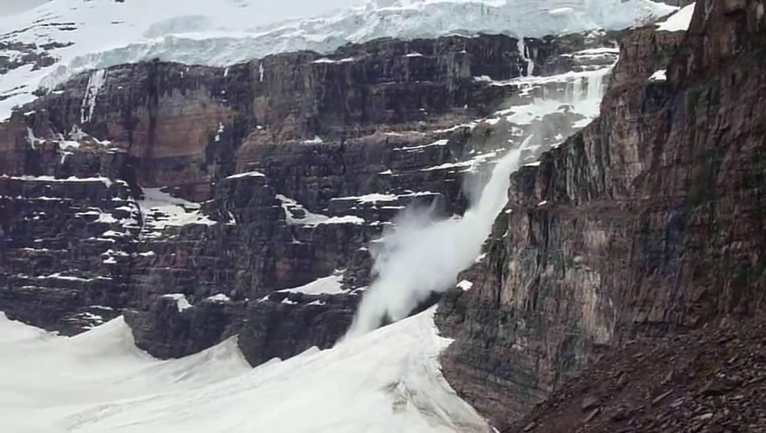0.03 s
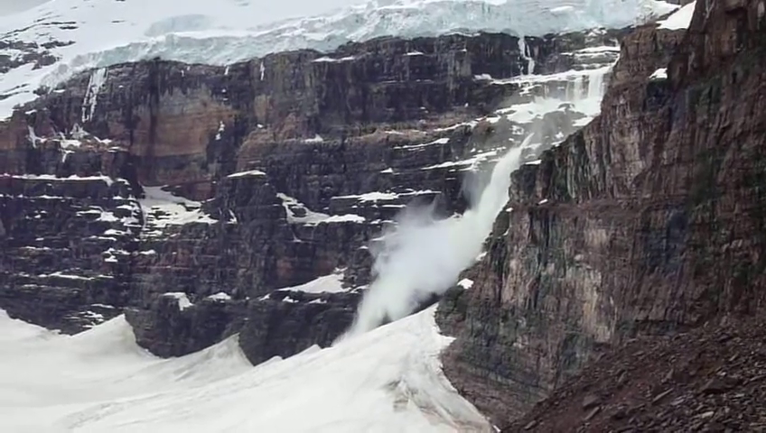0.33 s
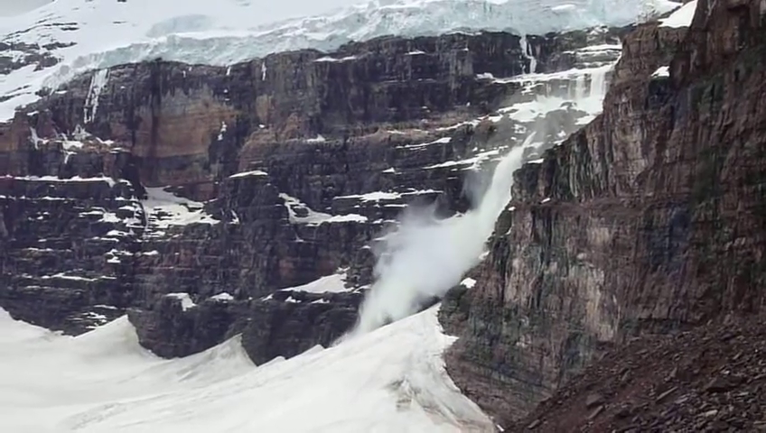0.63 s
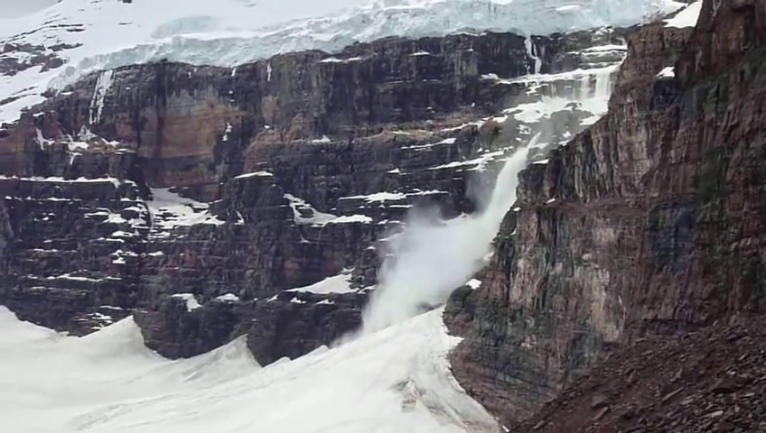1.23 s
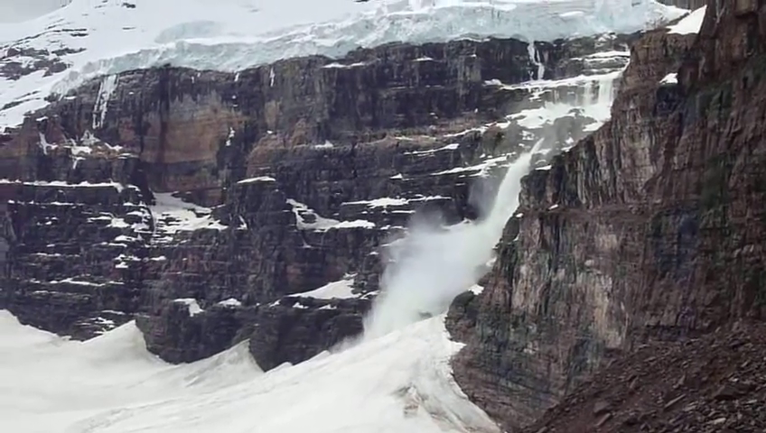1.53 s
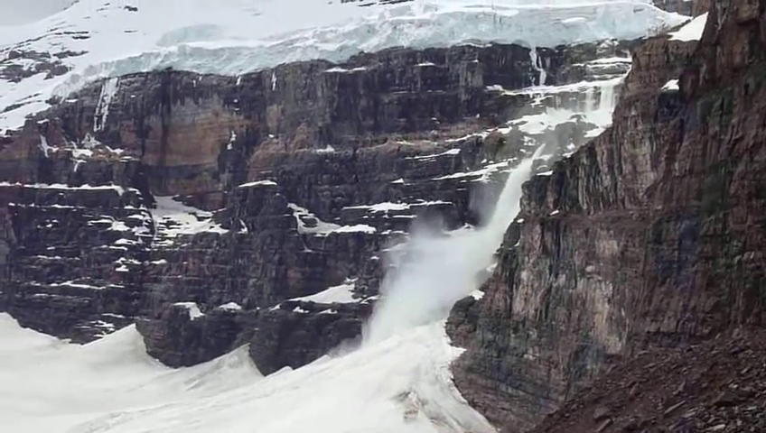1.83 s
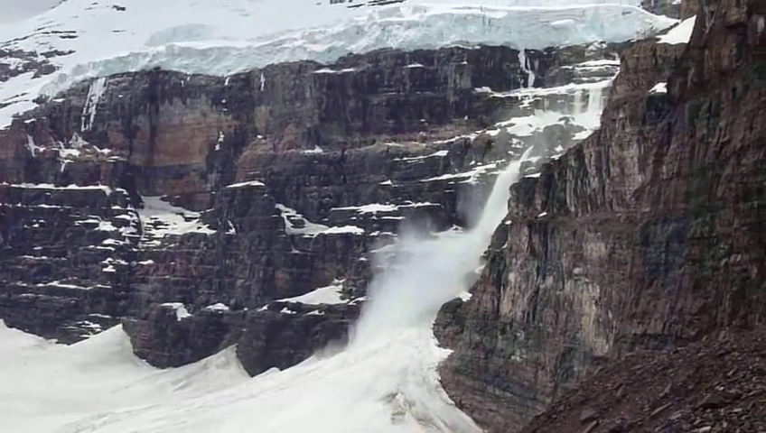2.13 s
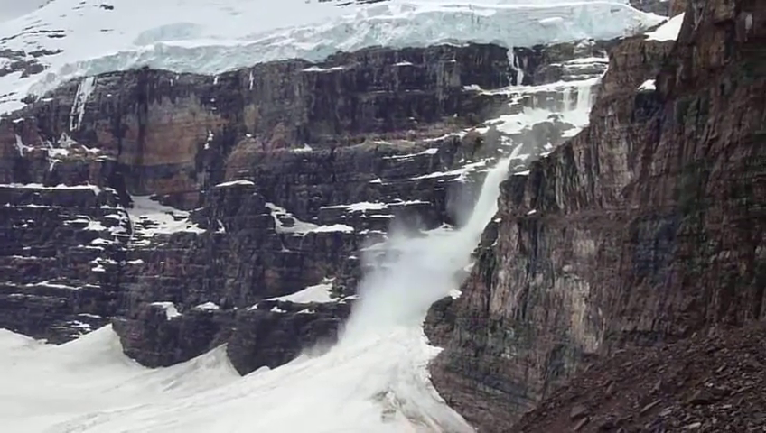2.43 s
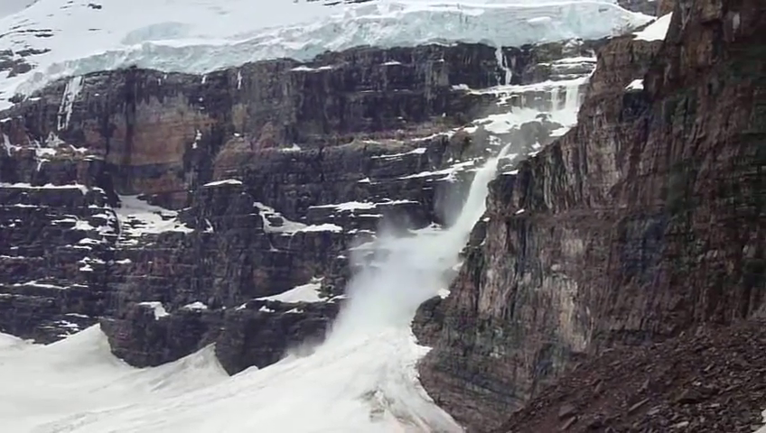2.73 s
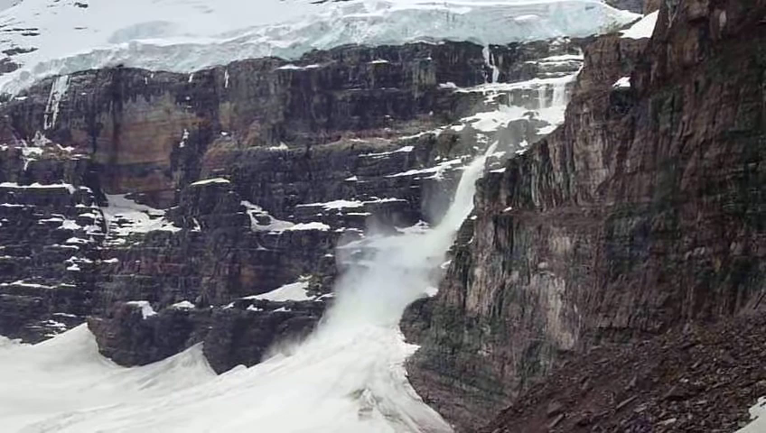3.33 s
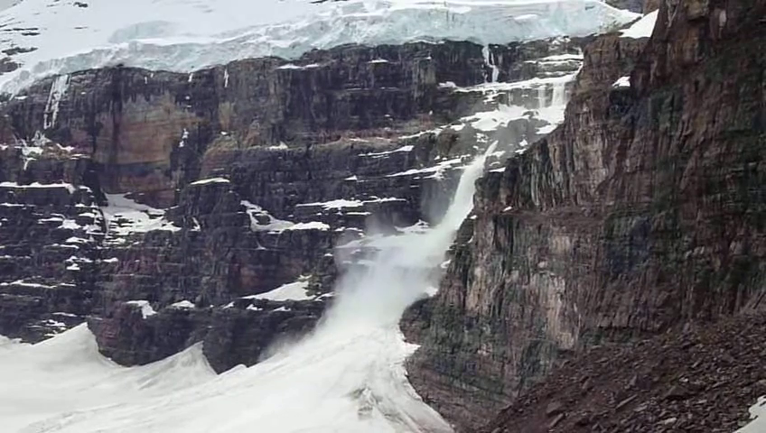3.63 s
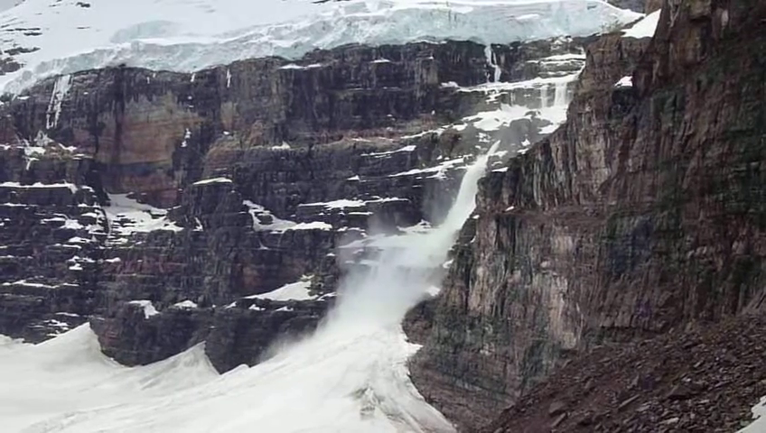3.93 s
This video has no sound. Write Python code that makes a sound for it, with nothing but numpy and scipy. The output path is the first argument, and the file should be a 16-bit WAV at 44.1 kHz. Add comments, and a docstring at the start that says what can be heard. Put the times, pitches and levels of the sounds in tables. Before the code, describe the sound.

Snow and ice roar dully down a far mountain wall, with knocks tumbling inside. A crack echoes off the rock at the start, then a gust thumps on the microphone and dies down, leaving the roar and a faint hiss.

```python
"""An avalanche of snow and ice pours down a far cliff: a dull roar with blocks knocking inside it, over
light wind and a faint hiss. In the first half second large blocks hit the rock, one with a sharp crack
that the walls scatter back. Then a gust buffets the microphone until about two seconds in. The wind
eases to a few stray thumps, one more block lands just after three seconds, and the roar slowly wanes."""
import sys
import numpy as np
from scipy import signal
from scipy.fft import rfft, irfft
from scipy.io import wavfile

SR = 44100
rng = np.random.default_rng(int(sys.argv[2]) if len(sys.argv) > 2 else 0)


def inscribe(sig):
    """Save sig as 16-bit PCM at rate SR to the path in sys.argv[1].

    A 1-D sig is mono; a 2-D sig holds one channel per row.
    Samples are clipped to [-1, 1] before scaling.
    """
    pcm = np.round(np.clip(np.atleast_2d(sig).T, -1, 1) * 32767)
    wavfile.write(sys.argv[1], SR, pcm.astype(np.int16))


N = 176400


def from_db(db):
    """Decibels to gain."""
    return 10 ** (np.asarray(db) / 20)


def unit_power(x):
    """Scale to an RMS of 1."""
    return x / np.sqrt(np.mean(x ** 2) + 1e-20)


def automation(rows):
    """Join (seconds, value) points into a curve at every sample."""
    return np.interp(np.arange(N) / SR, *np.transpose(rows))


def drift(per_s):
    """Smooth random wandering with a spread of 1."""
    hop, warm_up = 40, 2000
    pole = np.exp(-2 * np.pi * per_s * hop / SR)
    jitter = rng.standard_normal(N // hop + warm_up + 2)
    slow = signal.lfilter([1], [1, -2 * pole, pole ** 2], jitter)[warm_up:]
    return np.interp(np.arange(N) / hop, np.arange(len(slow)), unit_power(slow))


def equalise(x, eq):
    """Minimum-phase EQ through (Hz, dB) points: nothing rings ahead of a hit."""
    size = 2 * N
    hz, db = np.transpose(eq)
    grid_hz = np.maximum(np.arange(N + 1) * SR / size, 1)
    gain = from_db(np.interp(np.log(grid_hz), np.log(hz), db))
    cepstrum = irfft(np.log(gain))
    cepstrum[1:N] *= 2
    cepstrum[N + 1:] = 0
    return irfft(rfft(x, size) * np.exp(rfft(cepstrum)))[:N]


def noise(eq):
    """Coloured noise at unit power."""
    return unit_power(equalise(rng.standard_normal(N), eq))


# The fader ride of the falling snow. Each row: time in seconds, level in dB.
FLOW_LEVEL = [(0, -36), (.5, -37), (1.0, -36.5), (1.55, -36.5), (2.2, -37.5), (2.6, -37), (3.1, -38.5),
              (3.5, -38), (3.8, -37.5), (4, -38)]
# The dull tone of the distant roar. Each row: frequency in Hz, gain in dB.
ROAR_EQ = [(40, -9), (100, 7.5), (200, -2.5), (330, -3), (500, 1), (700, 0), (880, -3), (1030, -10),
           (1180, -7.5), (1350, -8.5), (1510, -14.5), (1700, -14), (2100, -16.5), (2700, -20.5),
           (3500, -32.5), (5000, -35.5), (9000, -61.5)]
FLUTTER_DB, KNOCKS_PER_S, KNOCK_SPREAD_DB, KNOCKS_DB = 0.51, 140, 1.5, -9.5
CLATTER_HZ, CLATTER_GROWS = (724, 1700), 0.62   # extra dB in this band for each dB of flow


def avalanche():
    """Powder roars smoothly while tumbling blocks knock at random; more flow is louder and harder."""
    powder = noise(ROAR_EQ) * from_db(FLUTTER_DB * drift(per_s=9))
    sizes = from_db(KNOCK_SPREAD_DB * np.minimum(rng.exponential(1, N), 3))
    polarity = rng.choice([-1, 1], N)
    strikes = rng.random(N) < KNOCKS_PER_S / SR
    knocks = unit_power(equalise(sizes * polarity * strikes, ROAR_EQ))
    roar = powder + from_db(KNOCKS_DB) * knocks
    flow_db = automation(FLOW_LEVEL)
    clatter = signal.sosfiltfilt(signal.butter(2, CLATTER_HZ, "band", fs=SR, output="sos"), roar)
    clatter_gain = from_db(CLATTER_GROWS * (flow_db - flow_db.mean()))
    return from_db(flow_db) * (roar + clatter * (clatter_gain - 1))


# Large blocks hitting the rock. Each row: start in seconds, peak in dB before reflections.
BLOCK_HITS = [(.049, -39), (.203, -22), (.3655, -14), (.4095, -25.5), (.4195, -26), (3.183, -25)]
# The tone of one hit. Each row: frequency in Hz, gain in dB.
CRACK_EQ = [(60, -5.5), (160, 2), (330, -4.5), (500, -1), (680, 0), (880, 1), (1030, -8), (1320, -6),
            (1550, -16), (2300, -26), (3500, -44), (9000, -70)]
GROUND_DELAY_S, GROUND_DB = 0.00192, -4.5
WALL_RISE_S, WALL_T60_S = 0.021, 0.63


def cracks():
    """Each large block gives one dull snap, followed by a swell of scatter from the rock walls."""
    t = np.arange(N) / SR
    snap = equalise(signal.unit_impulse(N), CRACK_EQ)
    hits = np.zeros(N)
    for start_s, db in BLOCK_HITS:
        hits[int(start_s * SR)] -= from_db(db)
    direct = signal.fftconvolve(hits, snap / np.abs(snap).max())[:N]
    # The grazing bounce off the scree arrives inverted.
    snaps = direct - from_db(GROUND_DB) * np.interp(t - GROUND_DELAY_S, t, direct)
    swell = (1 - np.exp(-t / WALL_RISE_S)) * from_db(-60 * t / WALL_T60_S)
    walls = rng.standard_normal(N) * swell
    return snaps + signal.fftconvolve(snaps, walls / np.linalg.norm(walls))[:N]


# The fader ride of the wind. Each row: time in seconds, level in dB.
WIND_LEVEL = [(0, -36.5), (.62, -33.5), (.72, -31.5), (.86, -30), (.93, -35), (1.01, -29), (1.12, -30.5),
              (1.24, -31.5), (1.36, -33), (1.47, -31.5), (1.88, -32), (2.1, -36.5), (2.5, -39), (2.64, -38),
              (2.80, -35), (2.92, -37.5), (3.31, -35.5), (4, -37)]
# The low rumble of turbulence. Each row: frequency in Hz, gain in dB.
WIND_EQ = [(15, -33), (28, -13), (50, 0), (85, 1), (130, -.5), (210, -4), (300, -11.5), (450, -19),
           (900, -34.5), (3000, -72.5)]
LUMPS_DB, CROSSOVER_HZ = 2.33, 140
GUST_BRIGHTENS, GUST_THINS = 0.5, 0.35   # dB of top boost and of bass cut for each dB of wind


def wind():
    """Lumpy turbulence on the microphone, brighter as it blows harder."""
    level_db = automation(WIND_LEVEL)
    gust_db = level_db - level_db.mean()
    air = unit_power(noise(WIND_EQ) * from_db(LUMPS_DB * drift(per_s=20)))
    bass = signal.sosfiltfilt(signal.butter(2, CROSSOVER_HZ, fs=SR, output="sos"), air)
    top = (air - bass) * from_db(GUST_BRIGHTENS * gust_db)
    return from_db(level_db) * (bass * from_db(-GUST_THINS * gust_db) + top)


# Thumps of strong eddies. Each row: centre in seconds, peak in dB, half-width in milliseconds.
EDDIES = [(0.6473, -21, 1.55), (0.6927, -25, 1.4), (0.7107, -16, 1.4), (0.7296, -19.5, 1.4),
          (0.7641, -18.5, 1.4), (0.7961, -19.5, 1.1), (0.8223, -17.5, 1.3), (0.8715, -18.5, 1.9),
          (.998, -20.5, 1.26), (1.0166, -19.5, 1.44), (1.1893, -21, 1.6), (1.2523, -21, 2.6),
          (1.33, -20.5, 1.85), (1.4065, -19.5, 1.45), (1.486, -16, 1.5), (1.5862, -20.5, 1.9),
          (1.604, -19.5, 2), (1.6628, -16.5, 1.74), (1.73, -18.5, 2.14), (1.8216, -16.5, 1.32),
          (2.3353, -19, 1.6), (2.771, -20, 1.77)]


def buffets():
    """An eddy's core sucks at the microphone, with a rise of pressure before and after."""
    t_ms, pressure = np.arange(N) / SR * 1000, np.zeros(N)
    for centre_s, db, half_width_ms in EDDIES:
        offset = (t_ms - 1000 * centre_s) / half_width_ms
        near = np.abs(offset) < 10
        pressure[near] -= from_db(db) * (1 - offset[near] ** 2) * np.exp(-offset[near] ** 2 / 2)
    return pressure


# The tone of the hiss. Each row: frequency in Hz, gain in dB.
HISS_EQ = [(200, -0.5), (3000, 2), (4000, -0.5), (4900, 1.5), (6100, 1.5), (7200, -2), (8000, -6),
           (8500, -19.5), (9000, -37)]
HISS_DB = -51.5


def hiss():
    """A faint, steady bed of noise under everything."""
    return from_db(HISS_DB) * noise(HISS_EQ)


def scene():
    """The far avalanche, the near wind and the hiss, in mono."""
    return (avalanche() + cracks() + wind() + buffets() + hiss())[None]


# Narrow dips in the treble of the whole mix. Each row: centre in Hz, width in Hz.
TREBLE_NOTCHES = [(5395, 530), (7700, 520), (8285, 500)]
CUTOFF_HZ = 8818


def record(dry):
    """The recorder notches the treble and cuts the top steeply."""
    for hz, width_hz in TREBLE_NOTCHES:
        dry = signal.lfilter(*signal.iirnotch(hz, hz / width_hz, fs=SR), dry)
    return signal.sosfilt(signal.ellip(10, .1, 80, CUTOFF_HZ, fs=SR, output="sos"), dry)


dry = scene()
out = record(dry)
inscribe(out)
```